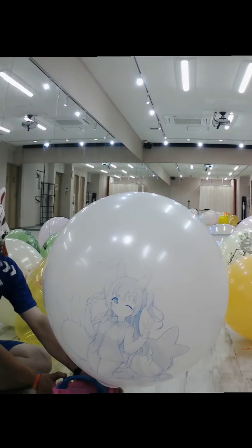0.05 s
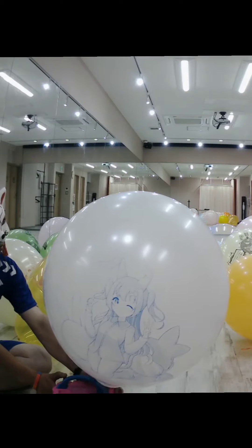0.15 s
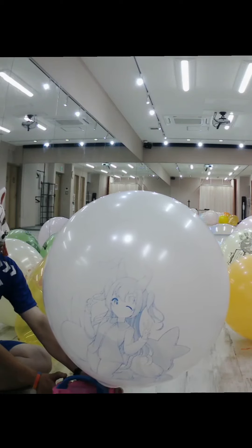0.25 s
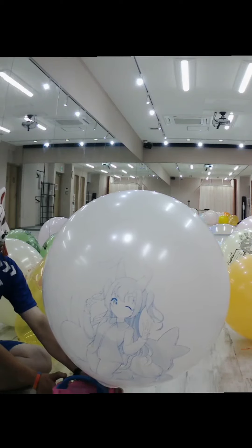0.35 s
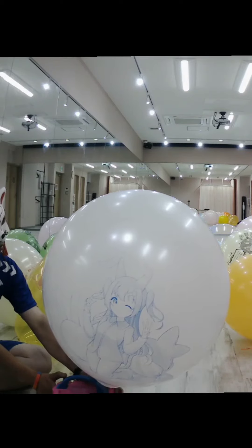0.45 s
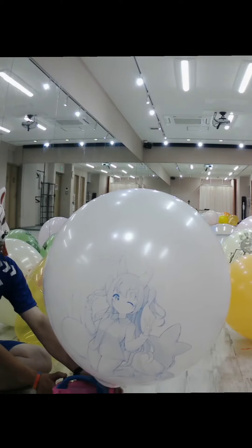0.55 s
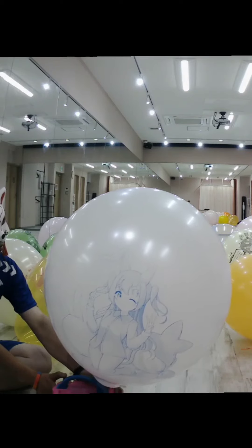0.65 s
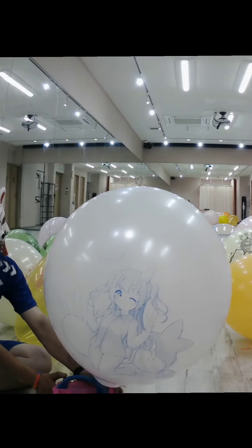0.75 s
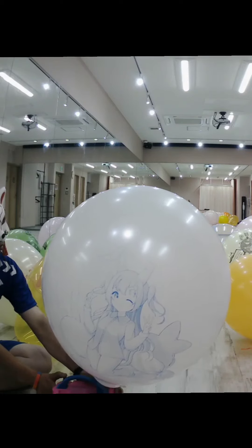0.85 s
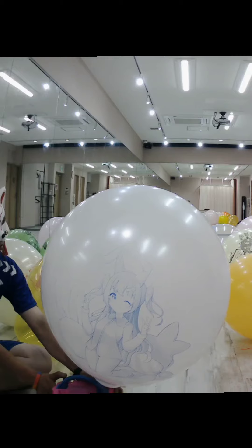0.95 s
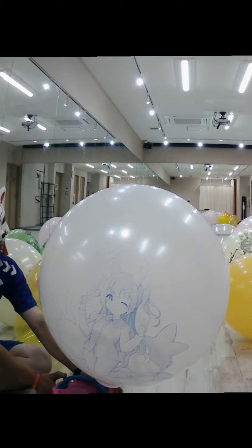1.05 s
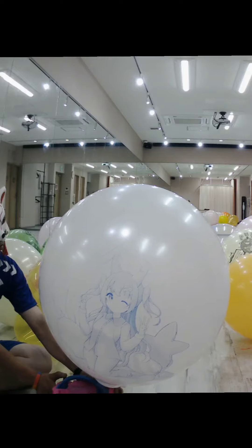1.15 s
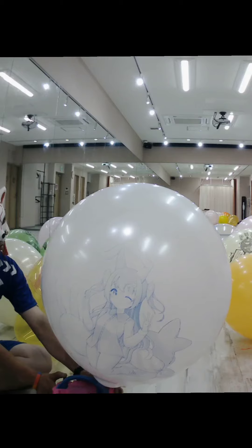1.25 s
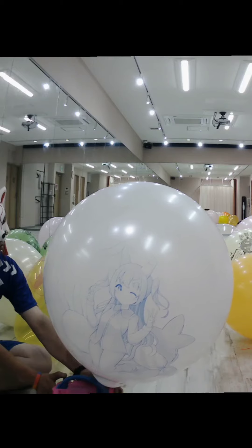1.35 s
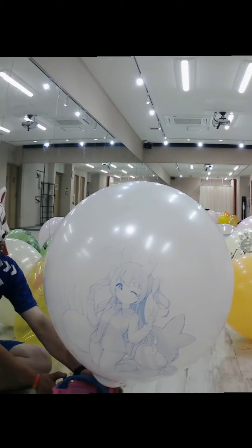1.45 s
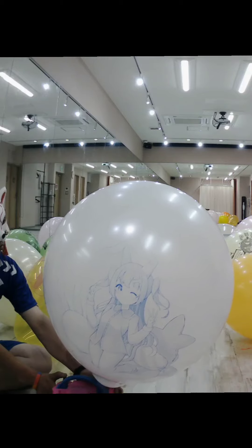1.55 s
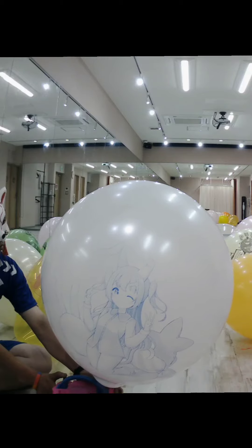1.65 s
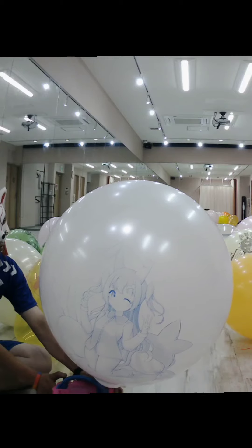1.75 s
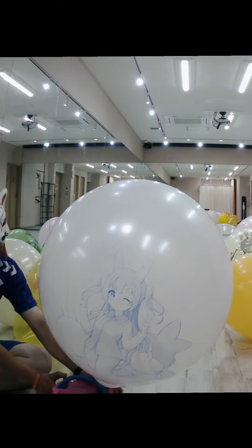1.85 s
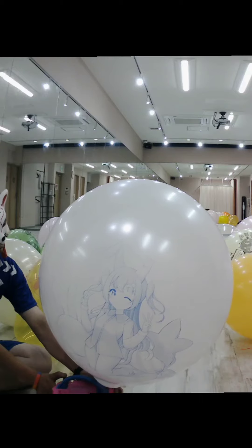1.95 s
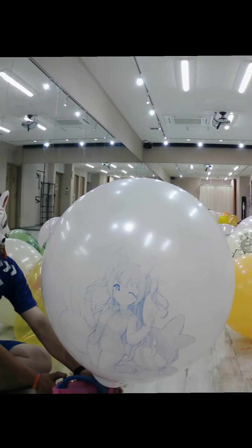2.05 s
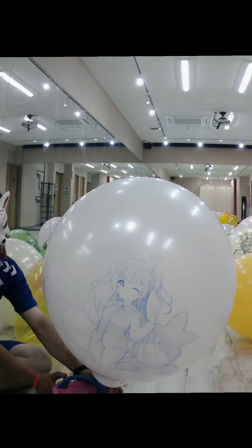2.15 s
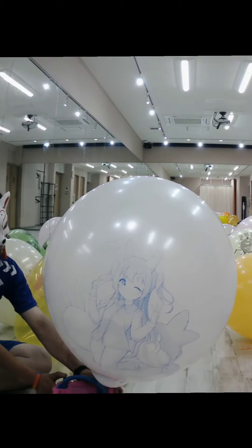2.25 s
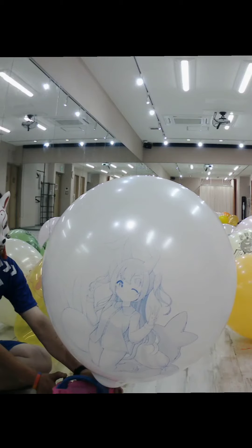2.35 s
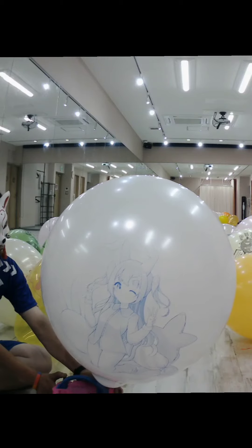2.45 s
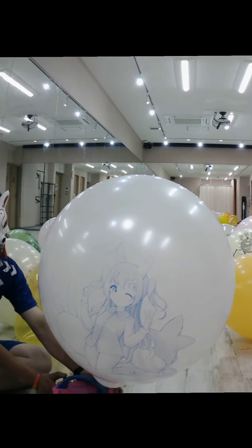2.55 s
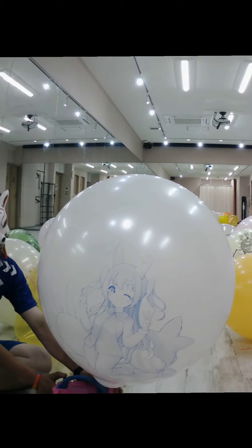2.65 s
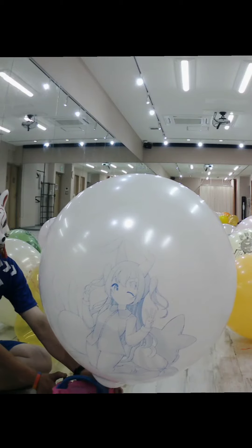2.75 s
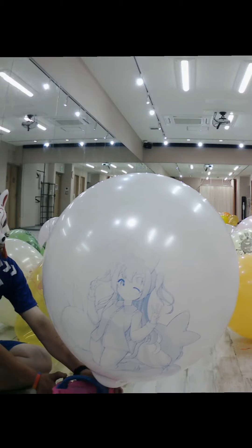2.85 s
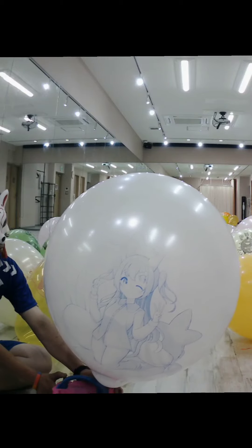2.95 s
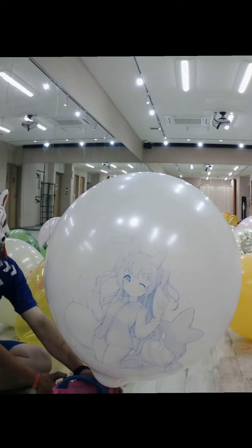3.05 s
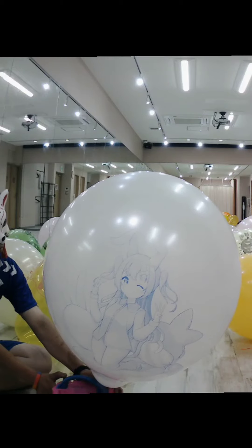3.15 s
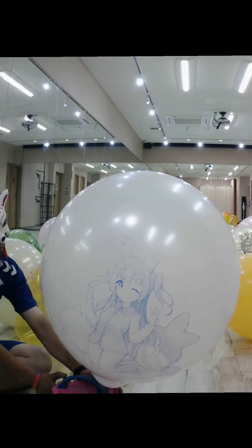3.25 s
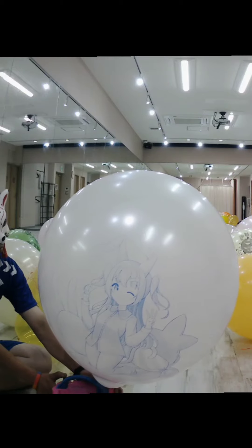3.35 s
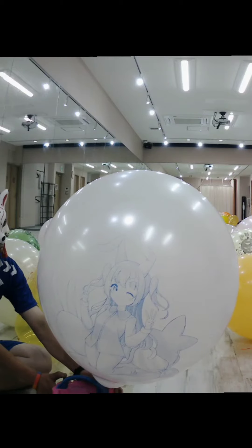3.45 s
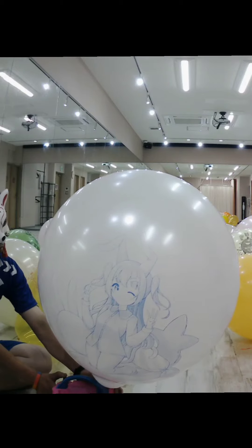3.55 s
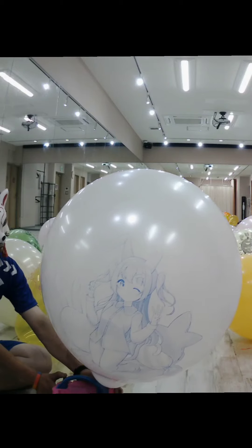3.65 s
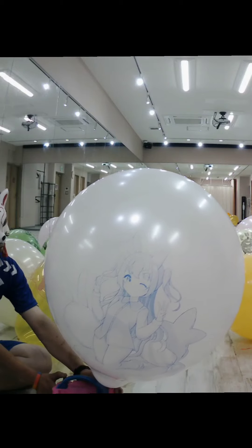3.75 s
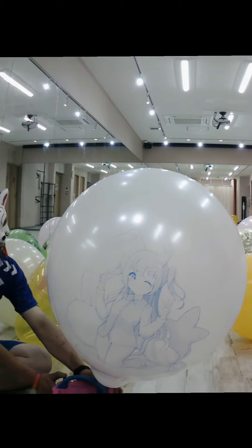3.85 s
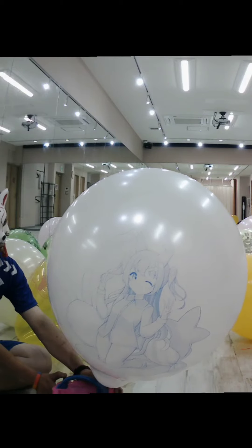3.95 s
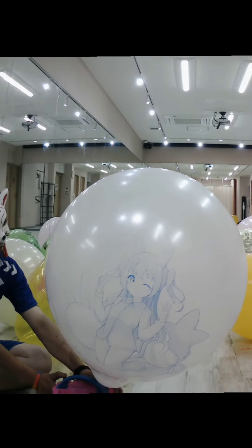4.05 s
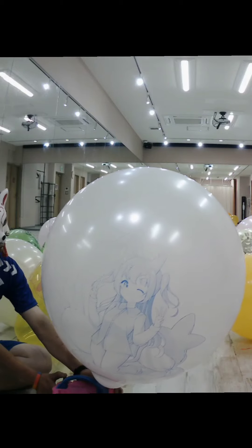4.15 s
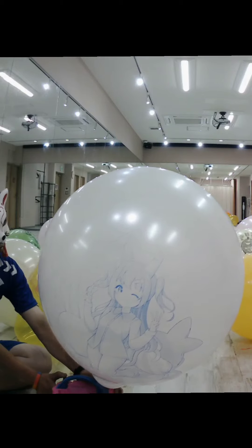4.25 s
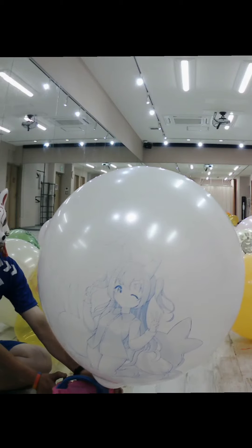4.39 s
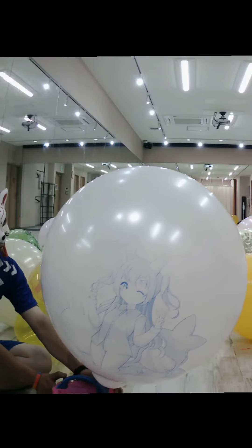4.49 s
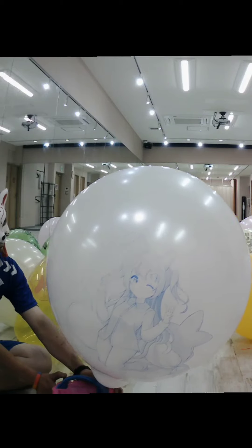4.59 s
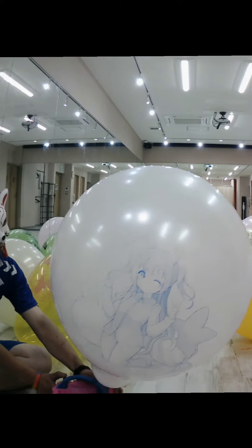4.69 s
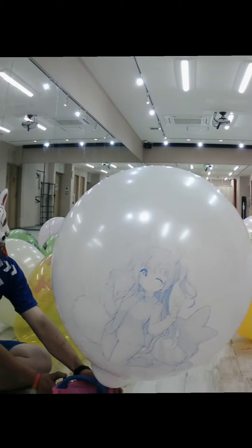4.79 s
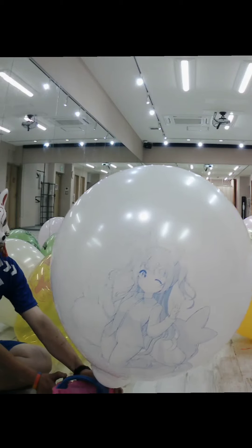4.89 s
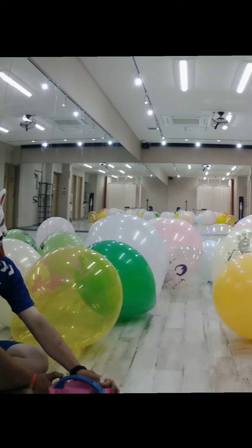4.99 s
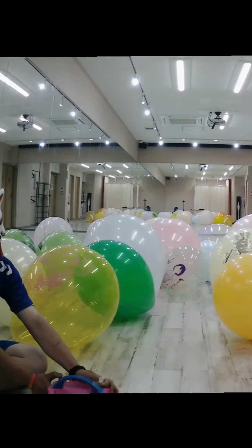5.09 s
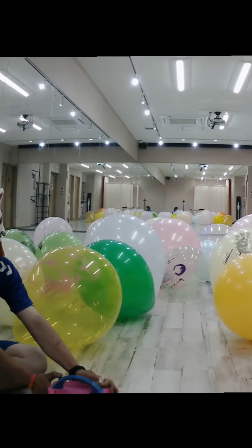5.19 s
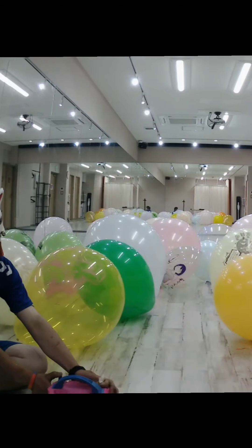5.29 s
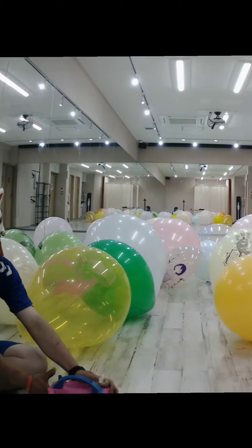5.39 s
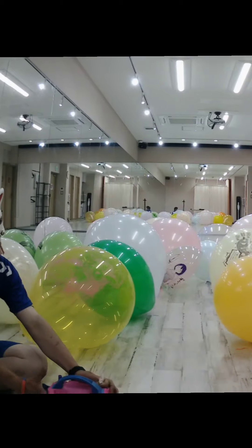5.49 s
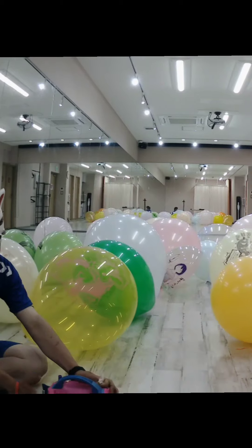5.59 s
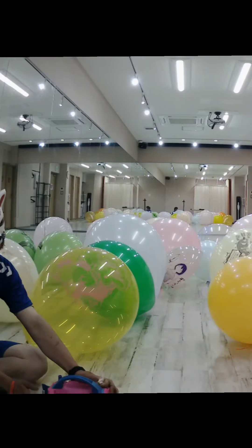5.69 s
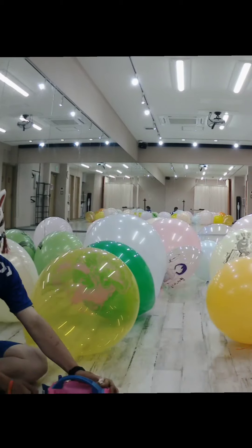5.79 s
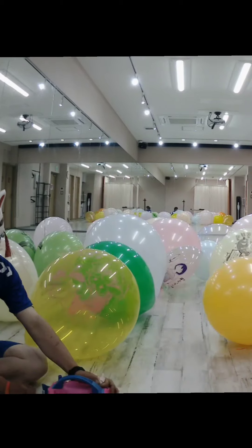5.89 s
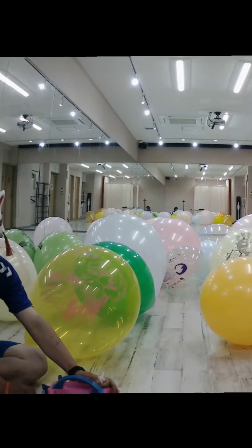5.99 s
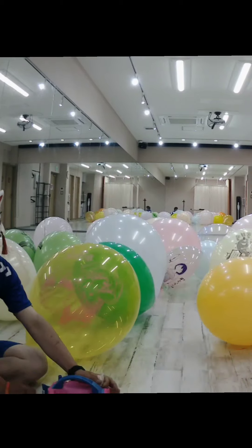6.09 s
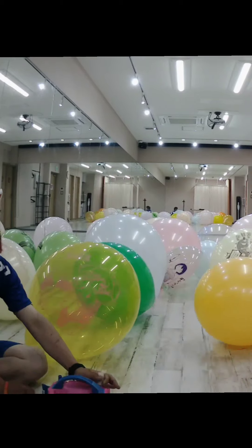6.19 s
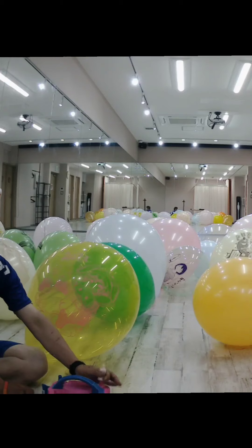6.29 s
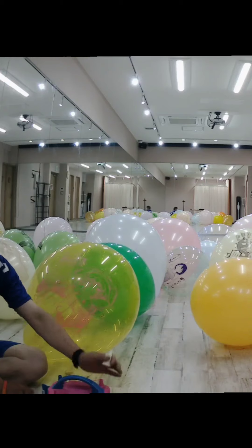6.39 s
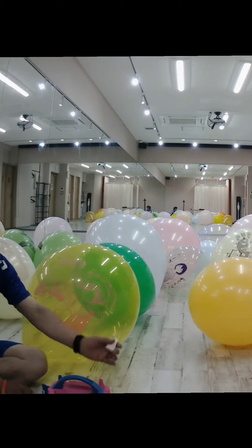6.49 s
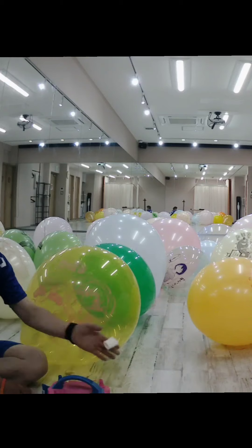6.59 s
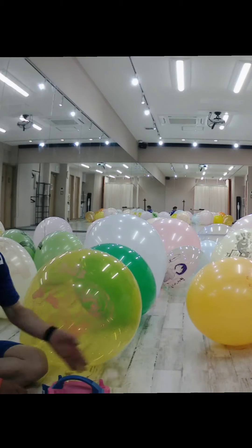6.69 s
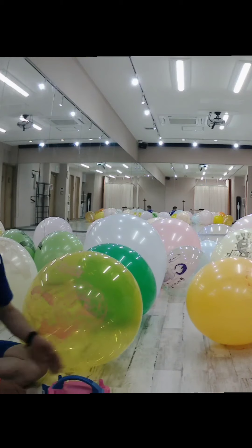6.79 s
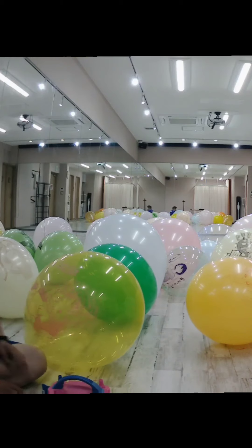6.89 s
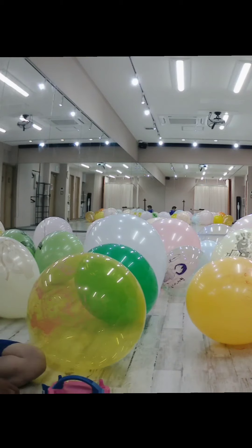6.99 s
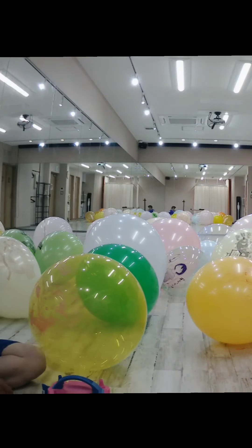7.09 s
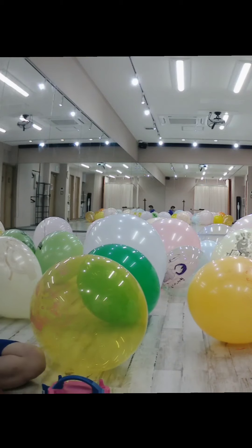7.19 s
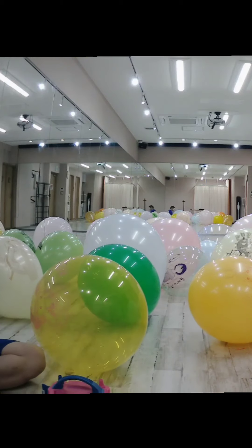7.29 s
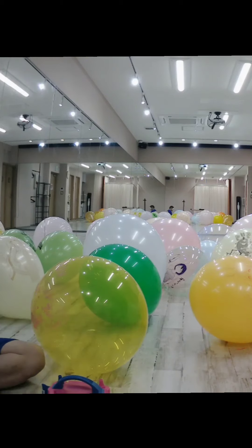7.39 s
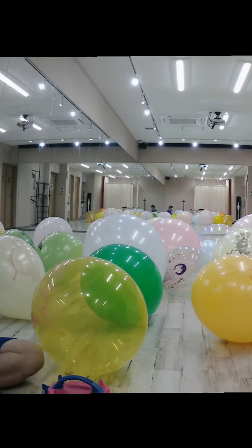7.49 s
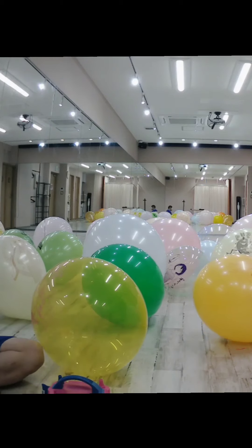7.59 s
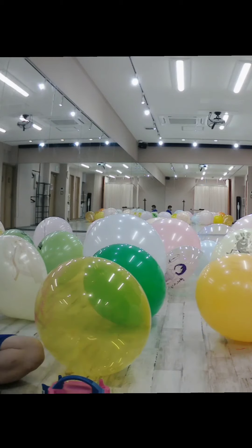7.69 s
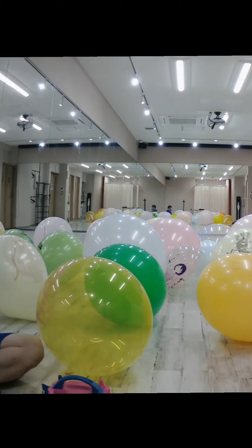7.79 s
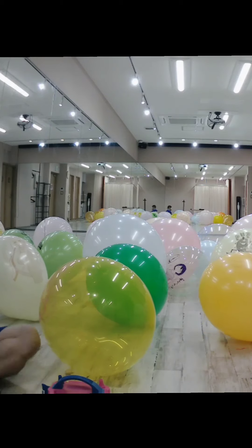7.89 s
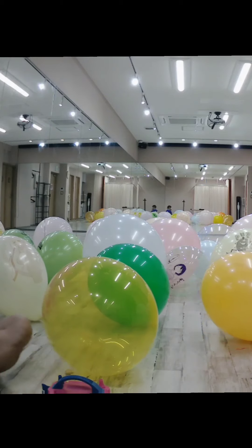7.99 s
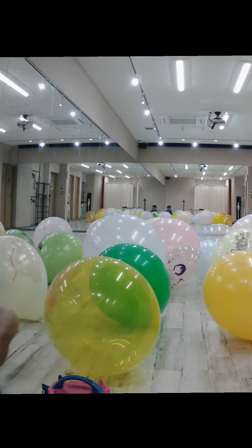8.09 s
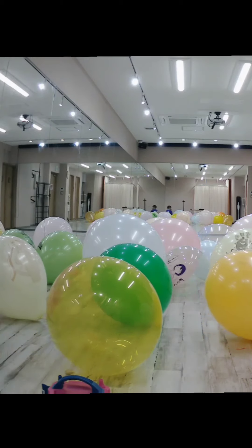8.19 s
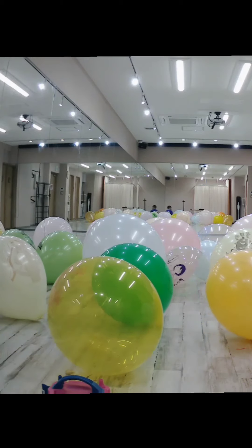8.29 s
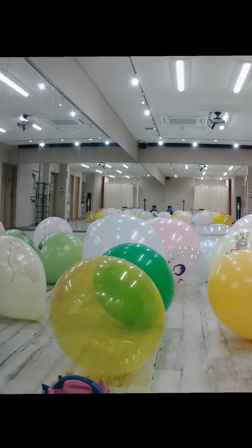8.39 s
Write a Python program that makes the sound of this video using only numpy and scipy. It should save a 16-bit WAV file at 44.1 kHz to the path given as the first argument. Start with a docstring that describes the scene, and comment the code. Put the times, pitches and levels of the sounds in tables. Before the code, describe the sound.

Steady motor whine and rushing air, then a violent balloon pop echoing through a large hall while the switched-off pump coasts lower and quieter.

```python
"""A small electric fan pump fills a balloon in a big hall: shaft and blade tones as sines over banded air noise.
The balloon bursts: noise bands decay with the hall and nearby balloons ring; the roar overloads the microphone.
Switched off, the motor coasts down in pitch, its third order exciting housing modes as it sweeps through.
Rubber scraps rustle as gated noise, a soft bump rings on the floor, and filtered-noise hum lies under it all."""
import sys
import numpy as np
from scipy import signal
from scipy.fft import rfft, irfft
from scipy.io import wavfile
from scipy.ndimage import uniform_filter1d

SR = 44100
rng = np.random.default_rng(int(sys.argv[2]) if len(sys.argv) > 2 else 0)


def pcm_store(signal):
    """Save signal as 16-bit PCM."""
    levels = np.round(np.clip(np.atleast_2d(signal), -1, 1) * 32767)
    wavfile.write(sys.argv[1], SR, levels.astype(np.int16).T)


N = 372204
TIME = np.arange(N) / SR
STEP = 40  # samples per control point
SLOW = np.arange(0, N + STEP, STEP) / SR

BURST_S, OFF_S = 5.071, 5.08  # balloon bursts, power cut
OFF = SLOW > OFF_S
POWERED_FADE_DB_S = 45
POWERED_DB = np.maximum(-POWERED_FADE_DB_S * np.maximum(SLOW - OFF_S, 0), -40)


def from_db(db):
    """Amplitude gain of a level."""
    return 10 ** (np.asarray(db) / 20)


def rms_one(x):
    """Scale to unit power."""
    return x / np.sqrt(np.mean(x ** 2) + 1e-20)


def at_hz(points, hz):
    """Read a table on a log-frequency axis."""
    table = np.array(points)
    return np.interp(np.log(hz), np.log(table[:, 0]), table[:, 1])


def at_time(points):
    """Read a table of (time, value) on the control grid."""
    return np.interp(SLOW, *np.transpose(points))


def envelope(level_db):
    """Per-sample gain from levels on the control grid."""
    return np.interp(TIME, SLOW, from_db(level_db))


def drift(rate_hz):
    """Two-pole low-passed noise of unit spread on the control grid."""
    r = np.exp(-2 * np.pi * STEP * rate_hz / SR)
    settle = 2000
    noise = rng.standard_normal(len(SLOW) + settle)
    return rms_one(signal.lfilter([1], [1, -2 * r, r * r], noise)[settle:])


def noise_bands(spectrum, change_db, size=N):
    """Third-octave noise of unit total power in the last `size` samples, each band moved by change_db(hz)."""
    edges = 35 * 2 ** (np.arange(27) / 3)
    centres = np.sqrt(edges[1:] * edges[:-1])
    gains = from_db(at_hz(spectrum, centres))
    gains = gains / np.sqrt(np.sum(gains ** 2 * np.diff(edges)) * 2 / SR)
    white = rng.standard_normal((2, size))  # neighbouring bands use different noise
    out = np.zeros(N)
    for k, hz in enumerate(centres):
        sos = signal.butter(2, edges[k:k + 2], "band", fs=SR, output="sos")
        band = signal.sosfilt(sos, white[k % 2])
        out[N - size:] += gains[k] * envelope(change_db(hz))[N - size:] * band
    return out


def resonance(x, hz, width_hz):
    """Two-pole resonance with unit peak gain."""
    r = np.exp(-np.pi * width_hz / SR)
    b = [(1 - r * r) / 2, 0, (r * r - 1) / 2]
    return signal.lfilter(b, [1, -2 * r * np.cos(2 * np.pi * hz / SR), r * r], x)


def ring(start_s, hz, level_db, t60_s):
    """A mode struck once: it swells over about a cycle, then decays exponentially."""
    age = np.maximum(TIME - start_s, 0)
    decay = from_db(level_db - 60 * age / t60_s)
    return decay * (1 - np.exp(-age * hz)) * np.sin(2 * np.pi * hz * age)


FULL_HZ, CREEP_HZ_PER_S = 586.3, .54  # creeps up as the balloon tightens
LAST_HZ = FULL_HZ + CREEP_HZ_PER_S * OFF_S
# Motor coasting: (time [s], shaft speed [Hz])
COASTING = [(5.95, 377.4), (6.4, 281.5), (6.49, 267.4), (6.7, 237.7), (6.93, 210), (7.36, 166), (7.66, 132),
            (8.0, 104.8), (8.44, 75.4)]


def shaft_speed():
    """Mean shaft speed [Hz] on the control grid: a slow climb under power, then coasting."""
    return at_time([(0, FULL_HZ), (OFF_S, LAST_HZ)] + COASTING)


BLADES = 7
SECOND_ORDER_DB = -48.5
THIRD_ORDER_DB = -33.5  # before the housing modes, through which alone it is heard
ECHO_S = .0935  # far wall returns the gliding tone late, so the two beat
# Shaft tone under power: (time [s], level [dB])
SHAFT_LEVEL = [(0, -20.5), (.7, -22.5), (1.5, -24.5), (2.15, -30.5), (3.1, -35), (3.9, -33.5), (4.35, -27),
               (4.8, -22)]
# Blade tone before drift and power-off fade: (time [s], level [dB])
BLADE_LEVEL = [(0, -50.5), (1.4, -44.5), (2.0, -48), (2.7, -55), (3.3, -47.5), (4.05, -43.5), (4.35, -53),
               (4.7, -45), (5.05, -53)]
# Coasting shaft tone radiated at each speed: (shaft speed [Hz], level [dB])
RADIATED = [(75, -80), (105, -68), (125, -60), (143, -46), (153, -55), (167, -71), (190, -59), (222, -50),
            (234, -39), (282, -41), (292, -48), (340, -46), (380, -38), (590, -22.5)]
# Far-wall return while coasting: (shaft speed [Hz], gain [dB])
ECHO = [(160, -24), (225, -7), (300, -4.5)]
# Housing modes excited by the third order: (frequency [Hz], width [Hz], gain [dB])
CAUGHT = [(846, 14, 0.5), (816, 8.3, -4), (732, 4, -3.5), (708, 3, -1.5)]


def motor_tones(speed_hz):
    """Orders of the shaft speed as slightly unsteady sines, sharing one phase."""
    unsteady_hz = speed_hz * (1 + 0.00083 * drift(8.4))
    turn_rad = 2 * np.pi * np.cumsum(np.interp(TIME, SLOW, unsteady_hz)) / SR

    def order(k, level_db):
        return np.sqrt(2) * envelope(level_db + 0.27 * drift(16)) * np.sin(k * turn_rad)

    shaft = order(1, np.where(OFF, at_hz(RADIATED, speed_hz), at_time(SHAFT_LEVEL)))
    echo_gain = envelope(np.where(OFF, at_hz(ECHO, speed_hz), -120))
    echo = echo_gain * np.interp(TIME - ECHO_S, TIME, shaft)

    second = order(2, SECOND_ORDER_DB + POWERED_DB + 3.3 * drift(5.5))
    third = order(3, np.where(OFF, THIRD_ORDER_DB, -120))
    caught = sum(from_db(gain_db) * resonance(third, hz, width_hz) for hz, width_hz, gain_db in CAUGHT)

    blade_db = at_time(BLADE_LEVEL) + POWERED_DB + 1.3 * drift(20) + 2.0 * drift(2.4)
    blade = order(BLADES, blade_db) + order(2 * BLADES, blade_db - 22.5)
    return shaft + echo + second + caught + blade


AIR_DB = -31.5  # before drift, slowing and housing
FREE_FLOW_DB = 9  # gained once the nozzle blows free
AIR_DB_PER_DECADE = 60.5  # lost per tenfold drop in speed
# Rushing air, relative spectrum: (frequency [Hz], density [dB per Hz])
AIR = [(40, -47.5), (75, -45.5), (140, -35.5), (240, -22), (300, -22), (500, -15), (700, -13),
       (1150, -14.5), (1550, -23.5), (2400, -24), (3100, -28.5), (4400, -29.5), (7400, -33.5), (8400, -40),
       (12800, -45)]
# How each band follows the slowing air: (frequency [Hz], loss [dB per dB])
AIR_FADE = [(100, -0.2), (400, 0.66), (800, 0.56), (1400, 0.65), (2100, 0.72), (3500, 1.0), (6000, 1.0),
            (10000, 1.2)]
# Housing, nozzle and floor resonances under power: (frequency [Hz], width [Hz], lift [dB])
HOUSING = [(100, 11, 8), (170.8, 5, 5.5), (226, 18, 6), (350, 16, 4), (581.6, 21, 7.5), (640, 7.4, 5),
           (709.6, 24, 10.5), (744, 13, 4), (837, 16, 7), (871.6, 16, 9), (923, 16, 4.5), (989, 20, 3.5),
           (1020, 18, 5), (1085, 22, 7), (1132, 14, 3.5), (1200, 22, 8), (1347, 18, 2.5), (1800, 66, 8.5),
           (2010, 78, 4.5), (2375, 56, 5.5), (2575, 50, 4), (3620, 104, 10.5), (4240, 110, 2),
           (5265, 77, 4), (6200, 85, 8.5), (7320, 120, 7), (9500, 290, 4)]


def rushing_air(speed_hz):
    """Flow noise following the fan speed, coloured by resonances in series."""
    slowing_db = OFF * (FREE_FLOW_DB + AIR_DB_PER_DECADE * np.log10(speed_hz / LAST_HZ))
    air = noise_bands(AIR, lambda hz: at_hz(AIR_FADE, hz) * slowing_db + .7 * drift(10))
    loaded = envelope(.3 * POWERED_DB)  # housing sings less once the motor is off
    for hz, width_hz, lift_db in HOUSING:
        air = air + (from_db(lift_db) - 1) * loaded * resonance(air, hz, width_hz)
    return from_db(AIR_DB) * air


def pump():
    """Motor tones and air noise driven by one shaft speed."""
    speed_hz = shaft_speed()
    return motor_tones(speed_hz) + rushing_air(speed_hz)


BURST_DB = 17.5  # at onset, before the treble changes
TREBLE_ONSET_DB, TREBLE_ONSET_S = -0.3, .008  # brief treble offset, its time constant
CLUMP_DB, CLUMP_DECAY_S = 7.0, 0.21
# Bang in the hall, relative spectrum: (frequency [Hz], density [dB per Hz])
BURST = [(40, -50.5), (120, -25), (200, -1.5), (300, 4), (600, -3), (1200, -11.5), (2500, -18.5),
         (5000, -24.5), (8000, -27.5), (12800, -38.5)]
# Hall decay: (frequency [Hz], t60 [s])
HALL = [(60, 1.2), (160, 0.85), (280, 0.99), (500, 1.266), (1100, 1.356), (2900, 1.35), (5500, 1.33),
        (8000, 0.8), (12000, 0.65)]


def burst():
    """The bang fills the hall at once and dies band by band."""
    age = np.maximum(SLOW - BURST_S, 0)
    onset = np.exp(-age / TREBLE_ONSET_S)
    # separate early echoes make the treble come in clumps
    clumps_db = CLUMP_DB * drift(80) * np.exp(-age / CLUMP_DECAY_S) * (1 - onset)
    treble_db = clumps_db + TREBLE_ONSET_DB * onset

    def change_db(hz):
        return -60 * age / at_hz(HALL, hz) + treble_db * min(hz / 2500, 1)

    return from_db(BURST_DB) * noise_bands(BURST, change_db, size=N - round(BURST_S * SR))


WOBBLE_DB = 2.5  # balloons sway, so their rings waver
# Balloons set ringing, before the wobble: (frequency [Hz], level [dB], t60 [s])
NEIGHBOURS = [(103, -29, 2.0), (213.6, -12, 1.91), (291, -2, 1.5), (319.2, -5.5, 1.79)]


def nearby_balloons():
    """Balloons struck by the bang ring on as decaying, wavering sines."""
    return sum(envelope(WOBBLE_DB * drift(7)) * ring(BURST_S, *mode) for mode in NEIGHBOURS)


RUSTLE_S, RUSTLE_DB = 6.49, -42  # peak of the swell, before flutter
RUSTLE_RISE_DB_S, RUSTLE_FALL_DB_S = 35, 44


def rubber_rustle():
    """A hand on rubber scraps: sparse random grains, band-passed, swelling and fading with flutter."""
    grains = rng.standard_normal(N) * (rng.random(N) < .2)
    grains = signal.sosfilt(signal.butter(2, [1300, 3300], "band", fs=SR, output="sos"), grains)
    late_s = SLOW - RUSTLE_S
    swell_db = np.minimum(RUSTLE_RISE_DB_S * late_s, -RUSTLE_FALL_DB_S * late_s)
    return envelope(RUSTLE_DB + swell_db + 1.2 * drift(40)) * rms_one(grains)


def floor_bump():
    """A soft bump on the floor: one low, quickly damped mode."""
    return ring(start_s=8.183, hz=60, level_db=-44, t60_s=.35)


ROOM_DB = -50.5
# Hall hum, relative spectrum: (frequency [Hz], density [dB per Hz])
ROOM = [(30, -28.5), (60, -14), (110, -17.5), (230, -9.5), (450, -13.5), (750, -6.5), (1150, -11),
        (1600, -29.5), (3300, -36.5), (7700, -41), (10500, -41.5), (12000, -58.5)]


def hall_hum():
    """Steady ventilation and distant noise: white noise shaped in the frequency domain."""
    hz = np.maximum(np.arange(N // 2 + 1) * SR / N, 1)
    spectrum = rfft(rng.standard_normal(N)) * from_db(at_hz(ROOM, hz))
    return from_db(ROOM_DB) * rms_one(irfft(spectrum, N))


def scene():
    """Sum of all sources, one channel."""
    mix = pump() + burst() + nearby_balloons() + rubber_rustle() + floor_bump() + hall_hum()
    return mix[None]


OVERLOAD = 0.44  # clipping height
HELD_DB, RELEASE_DB_S = -9.5, 39  # loudness the gain control allows, its recovery
CUTOFF_HZ = 12650


def record(dry):
    """Microphone stage clips and softens, quick gain control holds loudness down, the top is cut."""
    drive = dry / OVERLOAD
    clipped = OVERLOAD * np.tanh(drive + drive ** 3)
    clipped = signal.sosfilt(signal.butter(1, 13000, fs=SR, output="sos"), clipped)
    power = uniform_filter1d(clipped ** 2, size=441, origin=-180)  # 10 ms, mostly look-ahead
    loud_db = 10 * np.log10(power + 1e-12)
    release_db = RELEASE_DB_S * TIME
    loud_db = np.maximum.accumulate(loud_db + release_db, axis=1) - release_db  # peak hold, linear fall
    held = clipped * from_db(np.minimum(0, HELD_DB - loud_db))
    return signal.sosfilt(signal.ellip(10, .3, 70, CUTOFF_HZ, fs=SR, output="sos"), held)


dry = scene()
out = record(dry)
pcm_store(out)
```